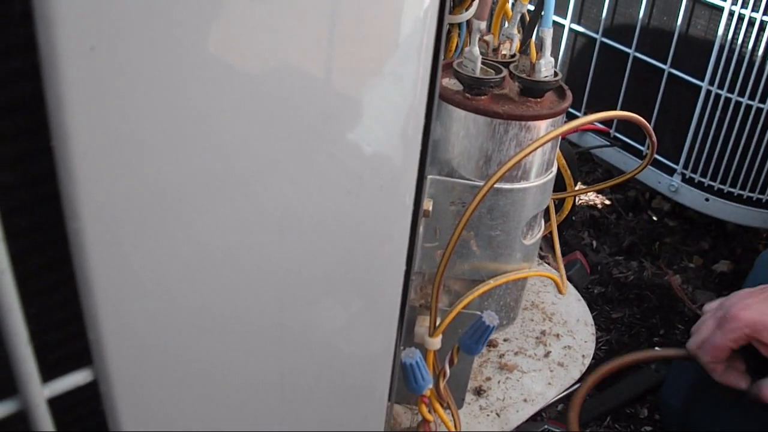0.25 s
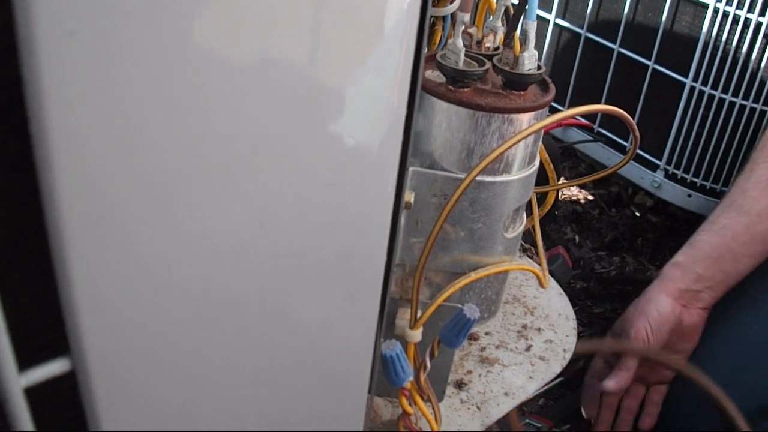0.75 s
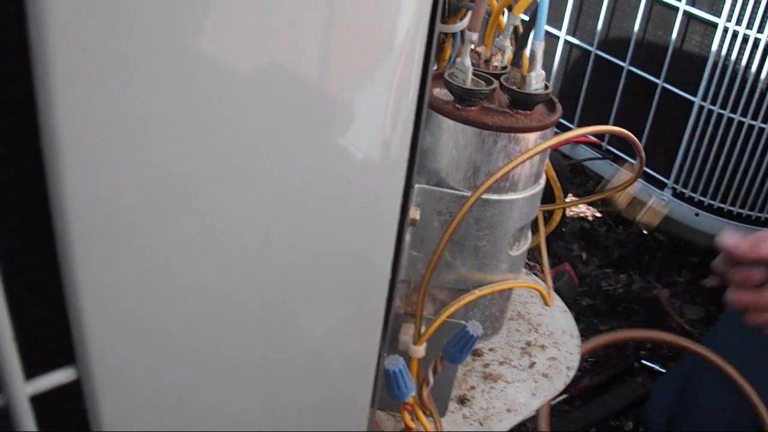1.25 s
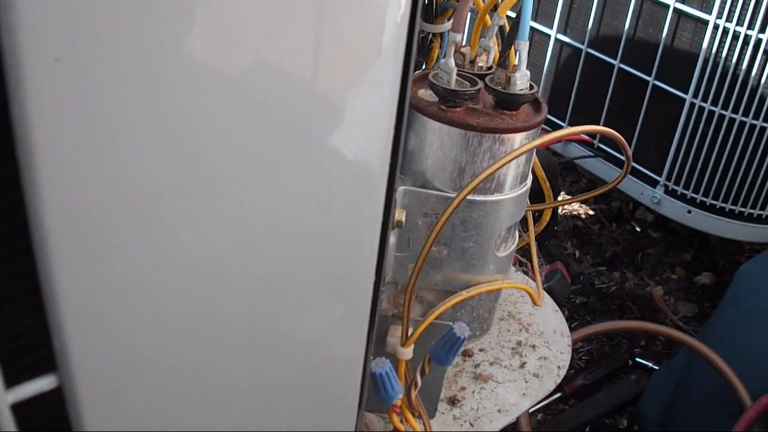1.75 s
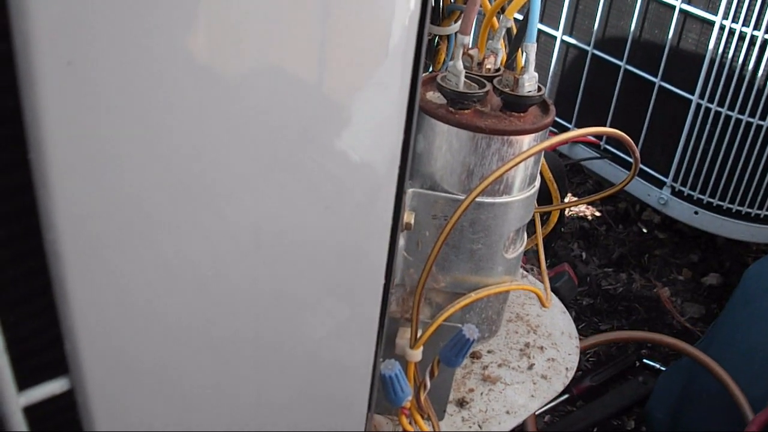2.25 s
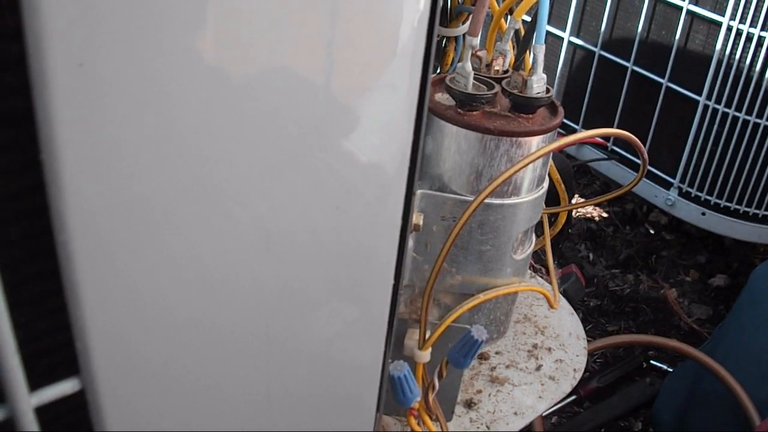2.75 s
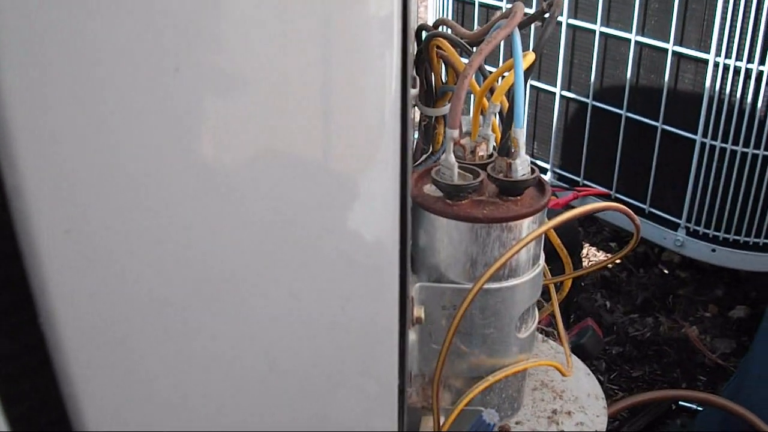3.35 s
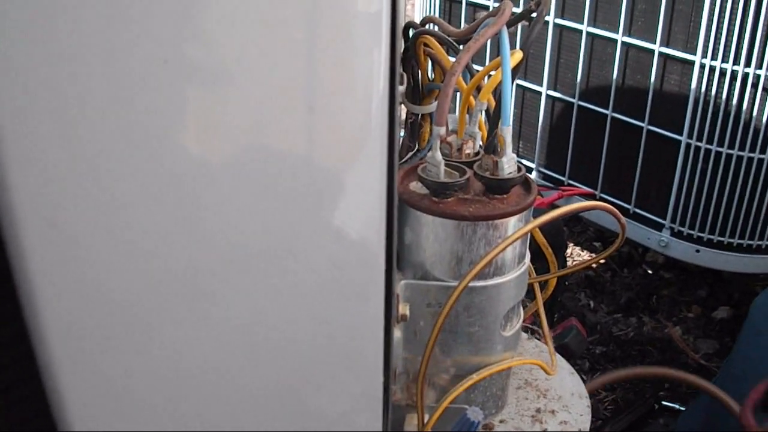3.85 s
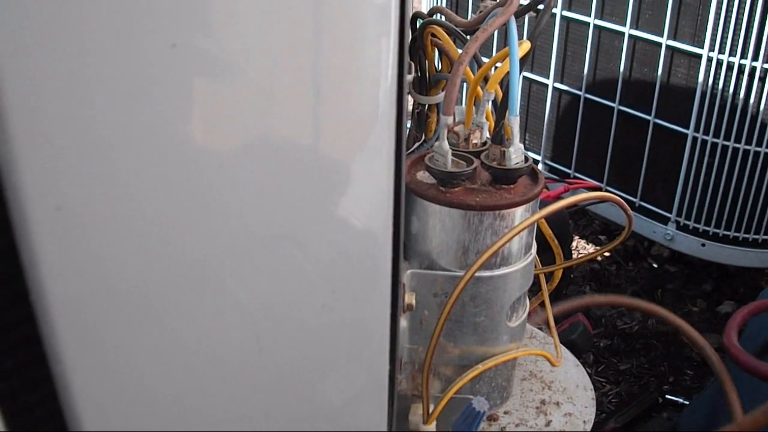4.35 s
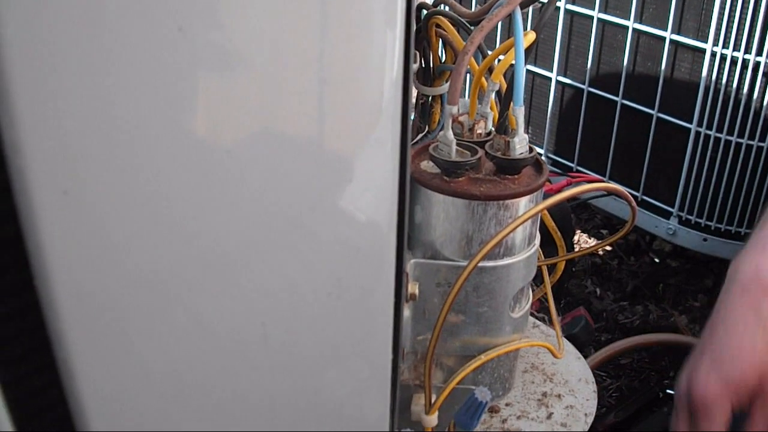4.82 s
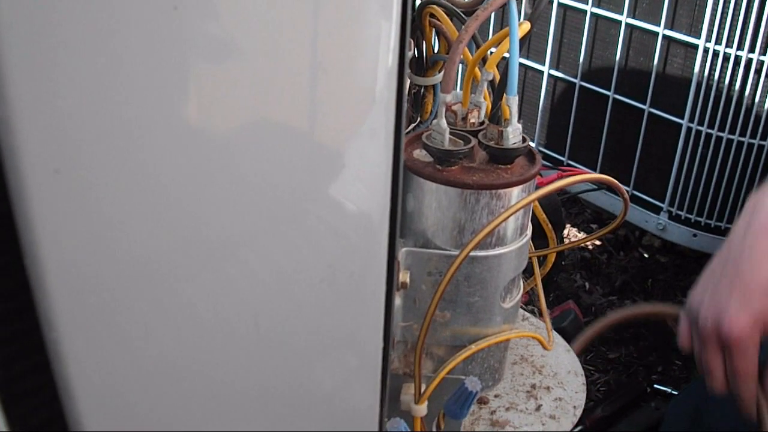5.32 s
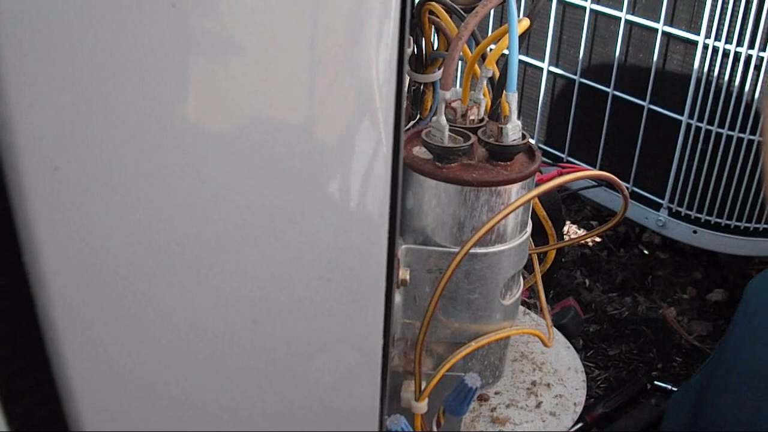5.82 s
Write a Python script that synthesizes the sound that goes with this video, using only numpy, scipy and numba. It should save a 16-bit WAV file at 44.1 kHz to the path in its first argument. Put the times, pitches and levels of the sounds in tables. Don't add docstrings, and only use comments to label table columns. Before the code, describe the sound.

An outdoor air-conditioning condenser drones very close by, its fan throbbing heavily under a compressor buzz, with wind-like buffeting and a few hose knocks.

```python
import sys
import numpy as np
from scipy import signal
from scipy.fft import rfft, irfft, next_fast_len
from scipy.io import wavfile
from scipy.ndimage import uniform_filter1d
from numba import njit

SR = 44100
rng = np.random.default_rng(int(sys.argv[2]) if len(sys.argv) > 2 else 0)


def boost(x):
    u = np.asarray(x, float) / 20
    return 10 ** u


def pcm_store(signal):
    levels = np.round(np.clip(np.atleast_2d(signal), -1, 1) * 32767)
    wavfile.write(sys.argv[1], SR, levels.astype(np.int16).T)


N = 268128
T = np.arange(N) / SR


def set_rms(x, db):
    return x * boost(db) / np.sqrt(np.mean(x ** 2))


def random_walk(rate_hz):
    hold = int(SR / rate_hz)
    steps = np.repeat(rng.standard_normal(N // hold + 1), hold)
    return 1.12 * uniform_filter1d(uniform_filter1d(steps, hold), hold)[:N]


def resonate(x, centre_hz, width_hz):
    b, a = signal.iirpeak(min(centre_hz, .4 * SR), centre_hz / width_hz, SR)
    return signal.lfilter(b, a, signal.lfilter(b, a, x))


def band_filter(x, order, edges_hz, kind="band"):
    return signal.sosfiltfilt(signal.butter(order, edges_hz, kind, fs=SR, output="sos"), x)


# frequency in Hz, density in dB per Hz.
AIR_SPECTRUM = [(12, -36), (50, -48), (130, -51.5), (250, -56.5), (480, -64.5), (680, -54), (900, -63),
                (1580, -71.5), (2100, -68.5), (2700, -74.5), (4000, -92), (6400, -90.5), (8000, -96.5),
                (11000, -96.5), (15000, -109)]


def air():
    size = next_fast_len(N)
    hz = np.maximum(np.fft.rfftfreq(size, 1 / SR), 1)
    point_hz, point_db = np.transpose(AIR_SPECTRUM)
    colour = boost(np.interp(np.log(hz), np.log(point_hz), point_db)) * np.sqrt(SR / 2)
    mid = rfft(rng.standard_normal(size)) * colour
    side = rfft(rng.standard_normal(size)) * colour
    side *= boost(-9) * np.minimum(hz / 5000, 1)
    swell = random_walk(1.58)
    out = 0
    for octave in np.arange(3, 15, .5):
        share = np.cos(np.pi * np.clip(np.log2(hz) - octave, -.5, .5)) ** 2
        m = irfft(mid * share, size)[:N]
        s = irfft(side * share, size)[:N]
        flicker = 1.2 * random_walk(9)
        out = out + boost(.3 * swell + flicker) * np.array([m + s, m - s])
    return out


# time in seconds, pressure peak from -1.5 to 1.5.
EDDY_SLAPS = [(0.1144, 0.51), (0.2488, 0.74), (0.4442, -0.93), (0.7101, -0.62), (.7645, -1),
              (0.9516, -0.78), (1.35, -1.17), (1.4738, 0.47), (1.7392, .7), (2.0421, -1.15), (2.1911, 0.59),
              (2.4059, 1.1), (2.5387, 0.93), (2.7367, -0.78), (2.8044, 1), (3.1098, -0.92), (3.231, .9),
              (3.337, 0.94), (3.524, 1.18), (3.6947, -1.47), (3.8154, 0.83), (4.03, 1.18), (4.387, -1.4),
              (4.786, -0.73), (4.9649, 0.74), (5.4185, 0.9), (5.506, -.9), (5.684, 1.15), (5.79, .8),
              (5.9039, -1.35)]


def buffets():
    share, length_s = .27, .0034
    out, length = np.zeros(N), int(length_s * SR)
    for start_s, peak in EDDY_SLAPS:
        i = int(start_s * SR) - int(0.6 * length)
        out[i:i + length] += share * peak * np.hanning(length)
    return out


# start in seconds, peak in dB, ring in Hz, t60 in seconds, rise in seconds.
HOSE_KNOCKS = [(2.2647, -2.5, 1350, 0.016, 0.0056), (2.265, -8, 2070, .018, .003),
               (2.2645, -22, 3450, .012, .001), (2.277, -20, 1370, .04, .003),
               (2.770, -20, 1470, .02, .0024), (2.796, -18, 1390, .03, .003),
               (4.040, -7.5, 2260, 0.017, 0.0023), (4.040, -26, 3400, .015, .002),
               (4.424, -23, 2050, .028, .003), (4.349, -24, 1510, .011, .001),
               (5.8657, -5, 1050, .014, .0006), (5.867, -9.5, 293, .037, .002),
               (5.870, -7, 780, .016, .001), (5.899, -2.5, 744, .004, .0007)]
# start in seconds, length in seconds, rms in dB, centre in Hz, width in Hz.
HOSE_SCRAPES = [(5.68, 0.055, -29, 1740, 1600), (6.2, .008, -41, 5530, 2500),
                (5.709, .005, -43, 8500, 5000), (5.715, .009, -34.5, 3000, 6000),
                (5.722, .01, -42, 5500, 4000), (5.765, 0.013, -37, 3700, 6200),
                (5.929, .003, -43, 5500, 2000), (5.866, 0.012, -19.5, 970, 900),
                (5.899, 0.0037, -19.5, 1000, 1100), (5.1, 0.0029, -42, 7000, 3000),
                (2.2645, .012, -24, 1800, 1700), (2.4, .009, -39, 4000, 12000),
                (4.040, 0.0083, -26, 2300, 1600)]


def hand():
    rasp_db = -33
    out, t = np.zeros(N + SR), T[:SR // 10]
    for start_s, db, ring_hz, t60_s, rise_s in HOSE_KNOCKS:
        decay = 1000. ** (-np.maximum(t - rise_s, 0) / t60_s)
        shape = (1 - np.exp(-t / rise_s)) * decay
        rasp = boost(rasp_db) * resonate(rng.standard_normal(len(t)), 2.0 * ring_hz + 1000, 5600)
        out[int(start_s * SR):][:len(t)] += boost(db) * shape * (np.sin(2 * np.pi * ring_hz * t) + rasp)
    for start_s, length_s, db, centre_hz, width_hz in HOSE_SCRAPES:
        grain_db = 4 * np.repeat(rng.standard_normal(len(t) // 30), 30)
        grit = rng.standard_normal(len(t)) * boost(grain_db)
        hiss = set_rms(resonate(grit, centre_hz, width_hz), db)
        out[int(start_s * SR):][:len(t)] += hiss * np.exp(-(t / length_s) ** 3)
    return out[:N]


def iron():
    hum_hz, start_turns = 119.958, .252
    hum_db, octave_db = -24.5, -31.5
    angle = 2 * np.pi * (start_turns + hum_hz * T)
    hum = boost(hum_db + 0.69 * random_walk(4.36)) * np.cos(angle)
    octave = boost(octave_db + 1.1 * random_walk(2.894)) * np.cos(2 * angle)
    return np.sqrt(2) * (hum - octave)


# multiple of the stroke rate, rms in dB.
SHELL_LINES = [(3, -36), (7, -44), (8, -49), (9, -50), (10, -34), (11, -32.5), (12, -37.5), (13, -47.5),
               (16, -52), (18, -52.5), (21, -46), (22, -57), (23, -50), (24, -47), (25, -49), (28, -55),
               (29, -53.5), (32, -55.5), (33, -53.5), (34, -48), (35, -55), (53, -55)]
# centre in Hz, width in Hz, rms of a line at the centre in dB.
VALVE_PLATES = [
    (4300, 900, -76),
    (5900, 1300, -72),
    (9900, 2600, -75),
]


def compressor():
    stroke_hz, size = 59.2725, 8192
    pipe_hz, pipe_width_hz, pipe_db = 2569, 510, -46.5
    pipe_odd_db = -7
    order = np.arange(size // 2 + 1)
    line_hz = order * stroke_hz

    valve = sum(boost(db) / (1 + (2 * (line_hz - hz) / width) ** 4) for hz, width, db in VALVE_PLATES)
    valve = valve * boost(4.5 * rng.standard_normal(len(order))) * (order > 61)

    pipe_peak = 1 / (1 + (2 * (line_hz - pipe_hz) / pipe_width_hz) ** 2)
    shell = boost(pipe_db + pipe_odd_db * (order % 2)) * pipe_peak * (order > 35)
    multiple, shell_db = np.transpose(SHELL_LINES)
    shell[np.rint(multiple).astype(int)] = boost(shell_db)

    phase_turns = .19 * order ** 2 + .3 * (order > 16) * rng.random(len(order))
    phases = np.exp(2j * np.pi * phase_turns)
    turns = stroke_hz * T + .001 * random_walk(1.5)
    out = 0
    for lines in (shell * (order < 17), shell * (order >= 17), valve):
        stroke = irfft(lines * phases) * size / np.sqrt(2)
        wave = np.interp(turns % 1 * size, np.arange(size), stroke, period=size)
        out = out + boost(0.58 * random_walk(6)) * wave
    return out


# time in seconds, blade passes in Hz.
BLADE_PASS_RATE = [
    (0, 37.543),
    (3.6, 37.545),
    (4.6, 37.522),
    (6.1, 37.512),
]
# time in seconds, throb in dB, second multiple relative to throb in dB.
THROB_LEVELS = [
    (0, -10.5, -11.5),
    (.6, -11, -9),
    (1.3, -11.5, -10),
    (2.6, -10, -12.5),
    (3.4, -11.5, -7.5),
    (4, -11.5, -12),
    (4.6, -11, -10),
    (5.2, -12, -10),
    (6.1, -11, -12),
]
# multiple of the blade rate, rms in dB.
BLADE_MULTIPLES = [(3, -43.5), (4, -34), (5, -43.5), (6, -59), (7, -42.5), (8, -47)]


def fan():
    start_turns = -.02
    rate_hz = np.interp(T, *np.transpose(BLADE_PASS_RATE))
    angle = 2 * np.pi * (start_turns + np.cumsum(rate_hz) / SR)
    time_s, throb_db, second_db = np.transpose(THROB_LEVELS)
    second = boost(np.interp(T, time_s, second_db)) * np.sin(2 * angle)
    out = boost(np.interp(T, time_s, throb_db)) * (np.sin(angle) - second)
    for multiple, db in BLADE_MULTIPLES:
        k = round(multiple)
        flutter = boost(db + 2.5 * random_walk(5))
        out -= (-1) ** k * flutter * np.sin(k * angle + .45 * random_walk(4))
    return np.sqrt(2) * out


def scene():
    return air() + buffets() + hand() + iron() + compressor() + fan()


@njit
def gain_stairs(x, gain, top, drop, climb, pace, react):
    out, since, wait = np.empty(len(x)), 0, -1
    for i in range(len(x)):
        since += 1
        if wait < 0 and abs(x[i]) * gain > top:
            wait = react
        if wait == 0:
            gain, since = gain * drop, 0
        elif wait < 0 and since >= pace:
            gain, since = gain * climb, 0
        wait = max(wait - 1, -1)
        out[i] = gain
    return out


def gain_control(dry):
    start_db, trip_level, trip_db = -1.5, .75, -3
    climb_db, climb_s, react_s = 1.5, .032, .0007
    return gain_stairs(dry.mean(axis=0), 1. * boost(start_db), trip_level, boost(trip_db), boost(climb_db),
                       int(climb_s * SR), int(react_s * SR))


def side_dropouts(side):
    share, hold = .3, 1536
    out = side.copy()
    for edges_hz in ((100, 1200), (1200, 3200), (3200, 5200)):
        lost = np.repeat(rng.random(N // hold + 1) < share, hold)[:N]
        out -= band_filter(side, 4, edges_hz) * uniform_filter1d(1. * lost, size=400)
    return out


def band_limit(x):
    return signal.sosfilt(signal.butter(12, 15770, fs=SR, output="sos"), x)


def record(dry):
    x = band_filter(dry * gain_control(dry), 2, (20, 17000))
    x = x / (1 + (x / 1.03) ** 14) ** (1 / 14)
    x = signal.sosfiltfilt(signal.cheby2(10, 40, 16300, fs=SR, output="sos"), x)
    lag = .95
    late = signal.lfilter([1 - lag, 1 + lag], [1 + lag, 1 - lag], x[0])
    mid = (late + x[1]) / 2
    side = side_dropouts(band_filter((late - x[1]) / 2, 2, 300, "high"))
    return band_limit(np.array([mid + side, mid - side]))


dry = scene()
out = record(dry)
pcm_store(out)
```